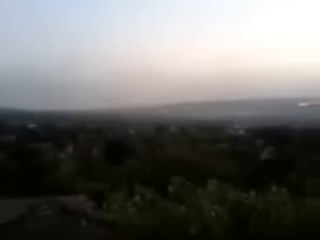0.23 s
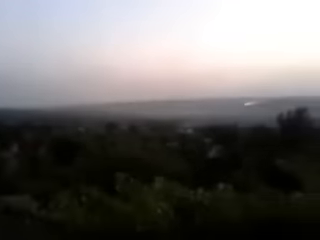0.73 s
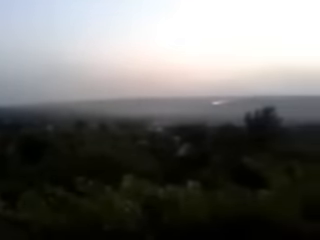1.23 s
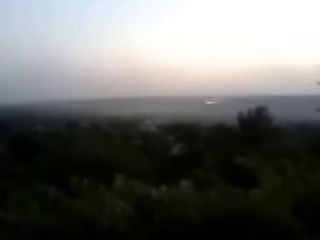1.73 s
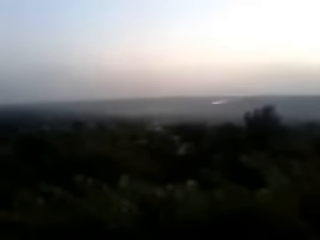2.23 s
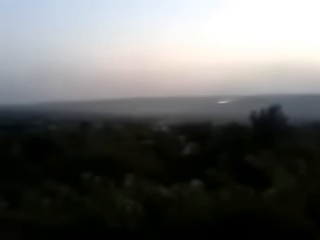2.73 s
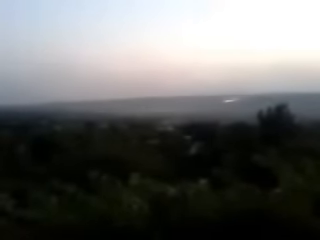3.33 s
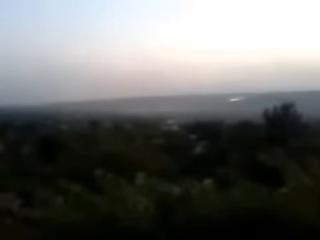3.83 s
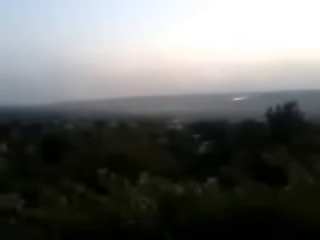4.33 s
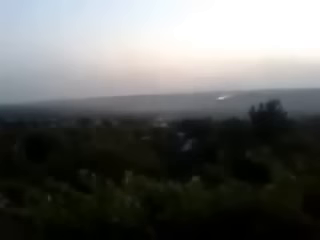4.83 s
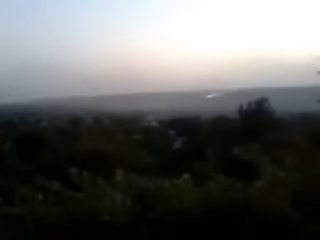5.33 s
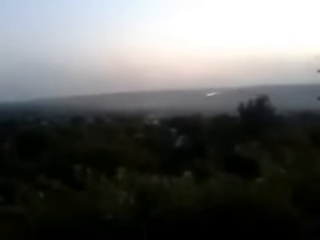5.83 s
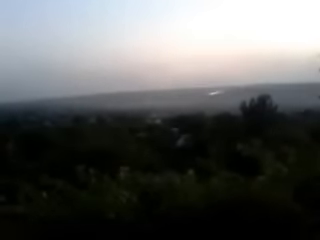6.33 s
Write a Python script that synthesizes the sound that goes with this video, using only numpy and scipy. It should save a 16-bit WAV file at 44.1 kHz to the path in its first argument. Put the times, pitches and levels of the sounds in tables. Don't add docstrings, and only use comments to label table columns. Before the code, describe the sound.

Outdoors on a hillside, a cheap phone microphone catches two rocket launches far across a valley. The first arrives almost at once as clipped, stuttering bangs and buzzing flutter, then thousands of echoes merge into a rolling low roar with small swells. Around four seconds the second blast strikes, sharper and more violent, crackling and choking the microphone, before another thunderous rumble gradually dies down without quite ending.

```python
import sys
import numpy as np
from scipy import signal
from scipy.fft import rfft, irfft
from scipy.io import wavfile
from scipy.ndimage import uniform_filter1d

SR = 44100
rng = np.random.default_rng(int(sys.argv[2]) if len(sys.argv) > 2 else 0)


def boost(x):
    u = np.asarray(x, float) / 20
    return 10 ** u


def log_audio(samples):
    frames = np.atleast_2d(samples).T
    limited = np.clip(frames, -1, 1)
    pcm = np.round(limited * 32767).astype(np.int16)
    wavfile.write(sys.argv[1], SR, pcm)


N = 290178


def bass_cut():
    return signal.cheby1(3, .2, 110, "high", fs=SR, output="sos")


def walk(rate):
    hold = int(SR / rate)
    levels = np.repeat(rng.standard_normal(N // 100), hold)[:N]
    slewed = uniform_filter1d(uniform_filter1d(levels, hold), hold)
    return slewed / np.std(slewed)


def echoes(per_second=1500, wash=1.2):
    clicks = (rng.random(N) < per_second / SR) * rng.uniform(-1.1, 1, N)
    return clicks / np.std(clicks) + wash * rng.standard_normal(N)


def mottle(x, patch_db=2.0, size=256):
    cells = signal.stft(x, nperseg=size)[2]
    field = rng.standard_normal(cells.shape)
    for _ in range(2):
        field = uniform_filter1d(field, size=2, axis=0)
        field = uniform_filter1d(field, size=8, axis=1)
    field[:3] = 0
    patches = boost(patch_db * field / np.std(field))
    return signal.istft(cells * patches, nperseg=size)[1][:N]


# (pitch [Hz], level [dB])
VALLEY = [(18, -41.5), (30, -16), (69, -2.5), (97, 4), (174, 1.5), (265, -3), (340, 0.5), (450, -11),
          (520, -18), (1100, -27), (1700, -34), (2400, -41), (2700, -42), (3800, -40.5)]
# (pitch [Hz], width [Hz], boost [dB])
HOUSING = [
    (881, 200, 3.5),
    (1350, 242, 3.5),
    (2176, 480, 3.5),
    (3200, 1400, 0.5),
]


def spectrum_gain(hz):
    valley_hz, valley_db = np.transpose(VALLEY)
    case_db = sum(peak_db / (1 + (2 * (hz - mid) / width) ** 4) for mid, width, peak_db in HOUSING)
    return boost(np.interp(np.log(hz + 1), np.log(valley_hz), valley_db) + case_db)


LAUNCHES_S = [
    .14,
    4.16,
]


def squeeze(hard_db=10, rest_db=0.65, fade_s=0.38, snap_s=.004):
    t = np.arange(N) / SR
    after = sum((t > s) * np.exp(-np.abs(t - s) / fade_s) for s in LAUNCHES_S)
    push = walk(50)
    push = np.interp(t + snap_s * push, t, push)
    return boost((rest_db + hard_db * after) * np.minimum(push, .7))


# (strength [dB], share of the front's extra [ratio], front length [s],
# fade stretch [ratio])
LAUNCH_SHAPES = [
    (-0.3, 0.68, 0.29, 1),
    (-.5, 1.6, 0.19, 1.324),
]
# (time [s], swell [dB],
# length [s], pitch [Hz])
SWELLS = [(0.306, 15.5, 0.03, 1790), (0.366, 9, 0.036, 1500), (0.427, 13, 0.016, 2000),
          (0.706, 7.5, 0.13, 600), (1.27, 4.5, 0.35, 3420), (1.561, 7, 0.069, 3200), (3.495, 3, 0.77, 2226),
          (4.299, 7, 0.033, 998), (4.53, 9.5, .09, 330), (0.235, -8.5, 0.068, 1500),
          (4.429, -8.5, 0.053, 1500), (.98, 2, 0.16, 756), (5.952, 4, .05, 1500), (1.23, 10.5, .08, 200),
          (1.349, 9.5, 0.087, 1000), (1.563, 2, 0.11, 90), (2.02, 3.5, 0.066, 1000),
          (2.335, 6.5, 0.12, 500), (2.485, 9.5, .07, 110), (2.72, 7, .12, 1200), (3.3, 10, 0.21, 600),
          (3.586, 3, 0.088, 900), (4.071, 4.5, 0.36, 1200), (5.158, 6, 0.18, 600), (5.392, 6, .08, 500),
          (5.557, 3, 0.28, 90), (5.85, 7, 0.23, 900), (6.34, 7, 0.15, 1200), (6.52, 11, 0.15, 2400)]


def register_db(hz, start_db, rest_db, fade_s, front_db, attack_s=0.022, swell_octaves=1.3):
    t = np.arange(N) / SR
    db = np.full(N, float(rest_db))
    for s, (strength_db, share, front_s, stretch) in zip(LAUNCHES_S, LAUNCH_SHAPES):
        since = np.maximum(t - s, 0)
        fading = (start_db + strength_db - rest_db) * np.exp(-since / (fade_s * stretch))
        front = share * front_db / (1 + (since / front_s) ** 6)
        risen = np.clip(.5 + (t - s) / attack_s, 0, 1)
        db += risen * (rest_db + fading + front - db)
    for s, swell_db, length_s, swell_hz in SWELLS:
        away_in_time = 2 * (t - s) / length_s
        away_in_pitch = np.log2(hz / swell_hz) / swell_octaves
        db += swell_db * np.exp(-away_in_time ** 2 - away_in_pitch ** 2)
    return db


LAYER_EDGES_HZ = [220, 500, 1600, 2400]
# (pitch [Hz], level after the blast [dB], resting level [dB],
# fade [s], extra in the front [dB])
REGISTERS = [
    (102, -12.5, -30.5, 2.18, 2),
    (338, -19.5, -36.5, 2.78, 8),
    (900, -26.5, -36, 1.48, 1.5),
    (2000, -29, -58, 1.34, -3),
    (3000, -38, -63, 1.5, 2.5),
]


def rumble():
    layer_db = [register_db(*row) for row in REGISTERS]
    hz = np.fft.rfftfreq(N, 1 / SR)
    lost = np.abs(signal.sosfreqz(bass_cut(), hz, fs=SR)[1]) + 0.013
    edges = np.r_[1e-3, LAYER_EDGES_HZ, 1e6]
    heard = rfft(mottle(echoes())) * spectrum_gain(hz)
    out = 0
    for lo, hi, db in zip(edges, edges[1:], layer_db):
        band = heard / np.sqrt((1 + (lo / (hz + 1)) ** 12) * (1 + (hz / hi) ** 12))
        in_air = irfft(band / lost, N) / np.std(irfft(band, N))
        out = out + in_air * boost(db + 0.47 * walk(18))
    return out * squeeze()


# (first swing time [s], swings [count],
# first direction [+-1], level [dB], loss before each swing [dB])
ROCKING = [
    (.324, 3, -1, 1, -24),
    (.393, 3, -1, 1.5, -17),
    (.4314, 4, 1, 3, -18),
    (.497, 3, -1, 1.5, -11),
    (.588, 2, 1, 1, -8),
    (4.3958, 2, 1, 8, -24),
    (4.5418, 2, 1, 3, -4),
    (4.602, 3, 1, 5, -11),
    (4.663, 3, 1, .5, -10),
]


def swings(period_s=.0155):
    rows = []
    for s, count, direction, db, loss in ROCKING:
        for k in range(count):
            rows.append((s + k * period_s, db, direction * (-1) ** k, loss))
    return rows


# (end time [s], length [ms], loss [dB])
DEAF = [(.1625, 6.5, -28), (.185, 10, -30), (.203, 4, -12), (.232, 11, -30), (.242, 4, -12),
        (.2625, 11.5, -32), (.272, 6, -22), (.286, 5, -22), (.369, 8, -22), (.558, 6, -12), (.574, 6, -12),
        (.753, 8, -28), (4.186, 14, -26), (4.242, 11, -30), (4.277, 12, -28), (4.327, 6, -24),
        (4.344, 11, -22), (4.427, 13, -26), (4.442, 12, -21), (4.46, 11, -26), (4.466, 3, -22),
        (4.482, 12, -24), (4.538, 11, -28), (4.583, 7, -14), (4.617, 11, -26), (4.763, 9, -14),
        (4.812, 10, -24), (4.888, 6, -14), (4.921, 4, -18), (4.972, 7, -22)]


def hearing(edge_ms=.4, lead_s=.003, stuck_ms_per_db=.36):
    free_db = np.zeros(N)
    before_swings = [(s - lead_s, -loss * stuck_ms_per_db, loss) for s, _, _, loss in swings()]
    for until, ms, db in DEAF + before_swings:
        span = np.arange(int((until - ms / 1000) * SR), int(until * SR))
        sinking = np.minimum(np.linspace(.1, 2.5, len(span)), 1)
        free_db[span] = np.minimum(free_db[span], db * sinking)
    arrived = np.arange(N) > (LAUNCHES_S[0] - .002) * SR
    return uniform_filter1d(boost(free_db) * arrived, int(edge_ms * SR / 1000))


# (time [s], level [dB], direction [+-1], rise [ms])
FIRST_JUMPS = [(.1479, 5.5, -1, .6), (.1506, -2.9, 1, 1.6), (.1648, 6.1, 1, 1.6), (.1706, -5.9, 1, .6),
               (.1868, -2.7, -1, 1), (.1894, .4, 1, 1), (.192, 8, -1, 1), (.2049, 5.7, 1, .6),
               (.216, 4.7, -1, .7), (.2339, 2.6, 1, 1.6), (.2457, 6.3, -1, .35), (.2786, -1.6, -1, 1.6),
               (.2886, -3.9, 1, .3), (.2947, -.3, -1, 1), (.2973, -3, 1, 1.2), (.3062, -2.6, -1, .6)]
# (time [s], level [dB], direction [+-1], rise [ms])
SECOND_JUMPS = [(4.1587, -2.6, 1, .3), (4.1668, 4.6, -1, .25), (4.1898, 5.7, 1, .6), (4.1964, 4.2, -1, .3),
                (4.212, 4.9, 1, .6), (4.2169, 3.2, -1, .3), (4.2267, 9.2, -1, 1), (4.2316, 4.7, -1, 1.6),
                (4.2469, 4.3, -1, 1.6), (4.2499, 4.1, 1, 1), (4.2599, 7.3, -1, .6), (4.2849, 7, -1, 1.6),
                (4.2913, 2.4, 1, .3), (4.294, 6.7, -1, 1.6), (4.2965, 2.7, 1, 1.6), (4.302, 2.5, 1, .4),
                (4.3124, 1.9, -1, .3), (4.3285, 5.8, 1, 1.6), (4.3465, 8.5, 1, 1), (4.3535, 1.8, -1, .6),
                (4.3582, 7.3, 1, 1.6), (4.3644, 4.1, -1, 1), (4.371, 6.8, 1, 1), (4.3785, 6.4, -1, .7),
                (4.4439, 4.6, 1, 1.6), (4.4871, 8.2, 1, 1.6), (4.5039, 1, -1, .6), (4.5153, -.9, -1, .6),
                (4.5217, 1.3, -1, 1), (4.5702, 2.8, -1, 1.6)]


def jumps(swing_rise_ms=1.3):
    return FIRST_JUMPS + SECOND_JUMPS + [(s, db, d, swing_rise_ms) for s, db, d, _ in swings()]


def under_blasts(depth_db=-19, swing_share=0.46, span_s=0.035):
    busy, span = np.zeros(N), int(span_s * SR)
    busy[(np.array(FIRST_JUMPS + SECOND_JUMPS)[:, 0] * SR).astype(int)] = span
    busy[(np.array(swings())[:, 0] * SR).astype(int)] = span * swing_share / 2
    crowding = uniform_filter1d(uniform_filter1d(busy, span), span // 4)
    return boost(depth_db * np.minimum(crowding, 1))


def rasp(db=-32, t60_s=0.015):
    hits = np.zeros(N)
    s, size_db, _, rise_ms = np.transpose(jumps())
    hits[(s * SR).astype(int)] = boost(size_db) / rise_ms ** 1.1
    fade = signal.lfilter([1], [1, -np.exp(-np.log(1000) / (t60_s * SR))], hits)
    band = signal.butter(2, [1100, 2800], "band", fs=SR, output="sos")
    treble = signal.sosfilt(band, rng.standard_normal(N))
    return boost(db) * uniform_filter1d(fade, size=30) * treble / np.std(treble)


# (time [s], level [dB], direction [+-1], length [ms])
CRACKS = [(0.1695, -4, -1, 0.48), (0.1917, -1, 1, 1), (0.2744, -8.5, 1, 0.99), (0.304, -7.5, -1, 0.295),
          (4.1606, -5.5, -1, 0.28), (4.1643, -1, -1, 0.45), (4.1896, 0.5, -1, 0.92), (4.2262, 2, 1, .7),
          (4.3143, 0, 1, 0.58), (4.3483, -9, -1, 0.85), (4.3587, -4, -1, 0.76), (4.4288, -14, 1, 0.38),
          (4.4606, -9.5, -1, 0.81), (4.4679, -8, -1, 0.96), (4.4831, -2.5, -1, 1), (4.4897, -6, -1, 0.64)]


def blasts():
    t, out = np.arange(N) / SR, np.zeros(N)
    for s, db, direction, rise_ms in jumps():
        out += direction * boost(db) * (.5 + .5 * np.tanh((t - s) * 2000 / rise_ms))
    for s, db, direction, length_ms in CRACKS:
        out += np.sign(direction) * boost(db) * np.exp(-((t - s) * 2000 / length_ms) ** 2)
    return out


def scene():
    roll = rumble()
    low = signal.sosfiltfilt(signal.butter(2, 650, fs=SR, output="sos"), roll)
    high = roll - low
    passed = hearing() * (high + low * under_blasts() + rasp())
    return (boost(.9) * blasts() + passed)[None]


def band_limit(x):
    return signal.sosfilt(signal.butter(12, 16000, fs=SR, output="sos"), x)


def record(dry):
    x = signal.sosfilt(bass_cut(), dry)
    x = signal.sosfiltfilt(signal.cheby2(9, 45, 4650, fs=SR, output="sos"), x)
    hiss = boost(-100) * rng.standard_normal(x.shape) * (np.arange(N) > LAUNCHES_S[0] * SR)
    mix = np.clip(x, -1, 1) + hiss
    return band_limit(mix)


dry = scene()
out = record(dry)
log_audio(out)
```